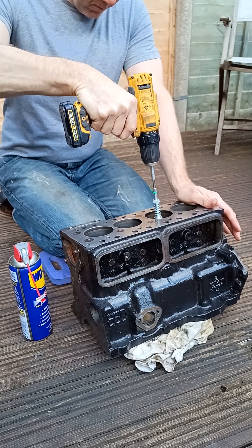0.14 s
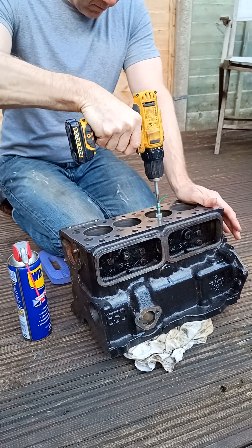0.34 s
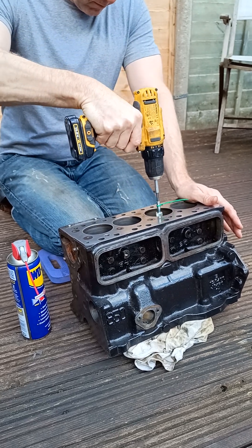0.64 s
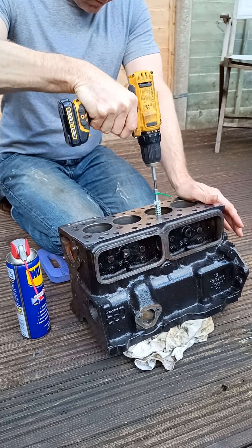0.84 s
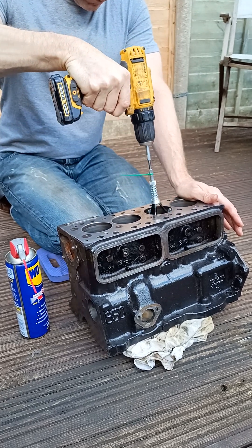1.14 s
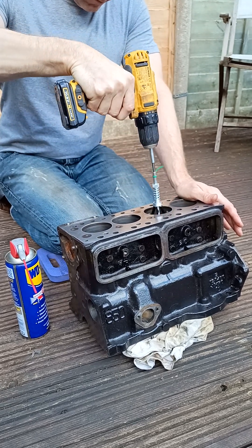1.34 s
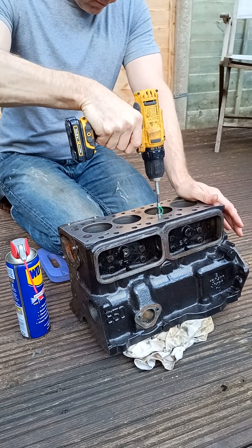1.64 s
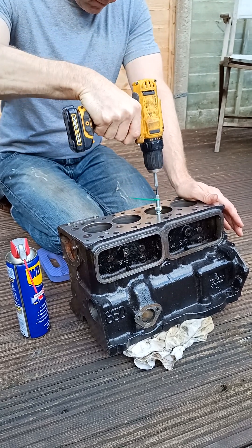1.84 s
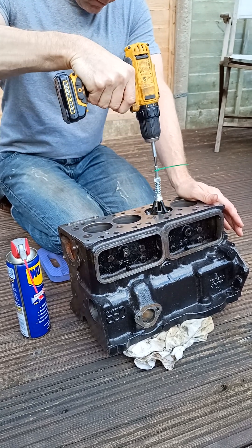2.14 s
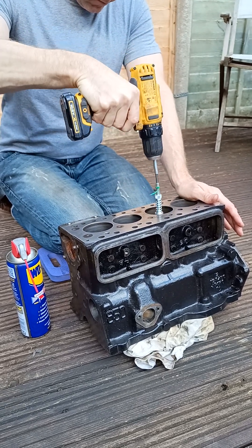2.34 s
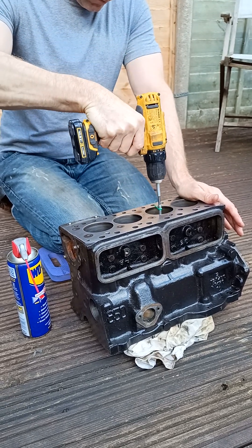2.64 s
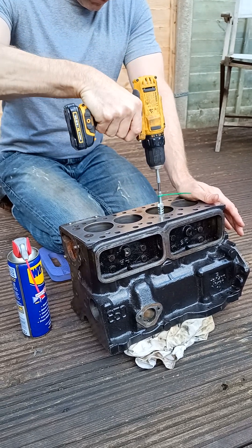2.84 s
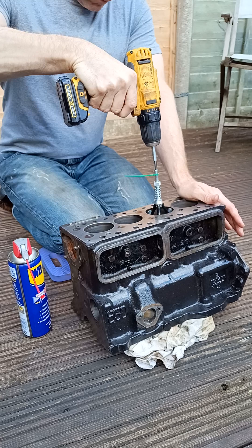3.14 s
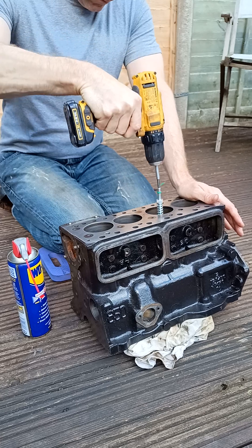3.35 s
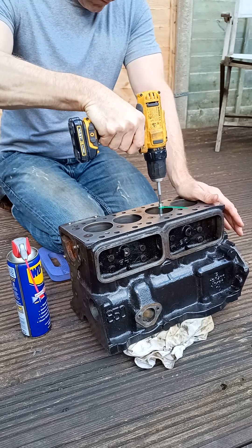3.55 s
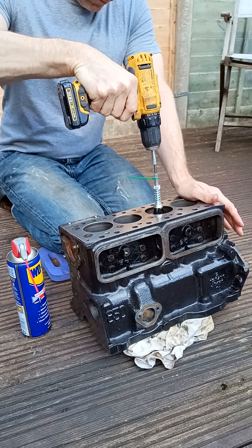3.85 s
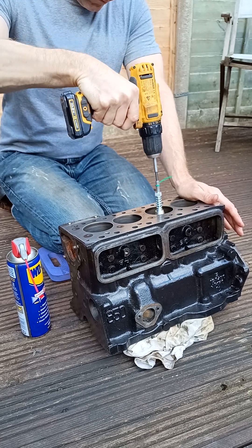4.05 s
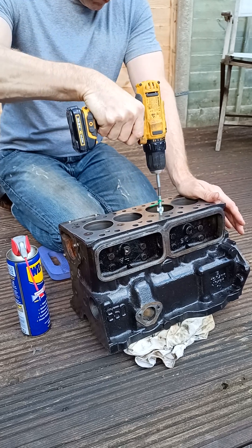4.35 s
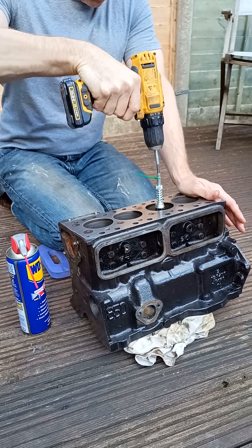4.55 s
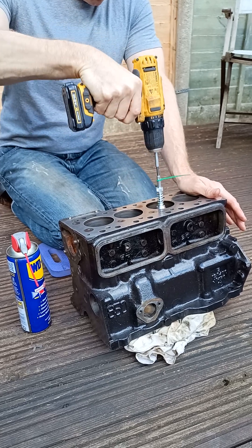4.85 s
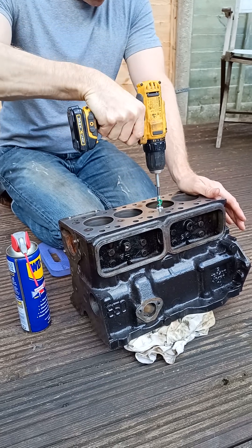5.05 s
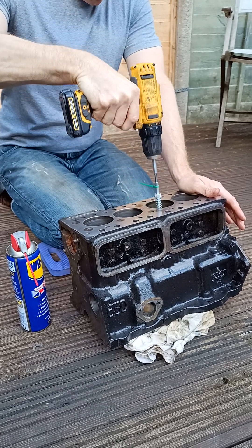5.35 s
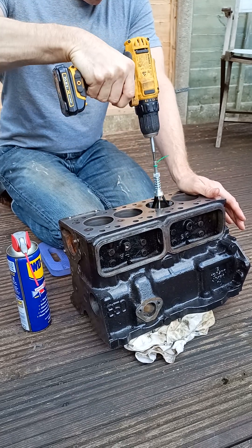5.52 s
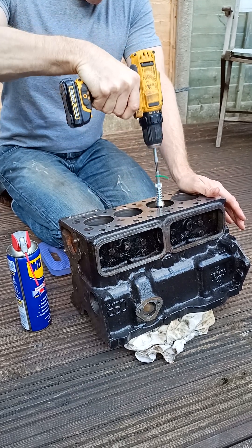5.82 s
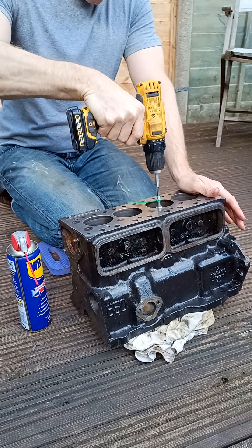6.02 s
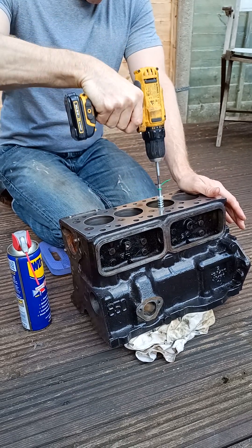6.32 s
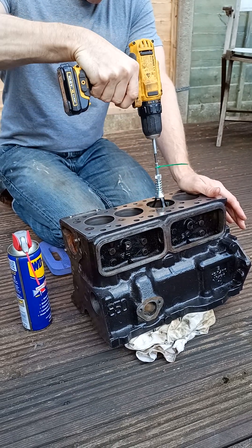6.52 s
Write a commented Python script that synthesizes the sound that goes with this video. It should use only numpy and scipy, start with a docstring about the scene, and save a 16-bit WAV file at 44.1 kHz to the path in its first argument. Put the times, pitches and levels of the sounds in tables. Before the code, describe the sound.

Honing stones scrape and rasp in an engine block's bore, spun by a whining cordless drill that slows, then speeds up again.

```python
"""A cordless drill whines as its hone grinds in a cylinder of a cast-iron engine block, on a garden deck.
Motor and gears sound through the housing; the speed controller sings near 4 kHz. The drill brakes to a
crawl, speeds up, then eases off. After a brief first bite the stones grind lightly, then bite hard,
ebbing where the stroke turns round. A faint outdoor rumble lies under it all."""
import sys
import numpy as np
from scipy import signal
from scipy.fft import rfft, irfft
from scipy.io import wavfile
from scipy.ndimage import uniform_filter1d, map_coordinates

SR = 44100
rng = np.random.default_rng(int(sys.argv[2]) if len(sys.argv) > 2 else 0)


def generate_wav(signal):
    """Clip the signal to [-1, 1] and save it as 16-bit WAV at the path in sys.argv[1]."""
    frames = np.transpose(np.atleast_2d(signal))
    scaled = np.clip(frames, -1, 1) * 32767
    pcm = np.round(scaled).astype(np.int16)
    wavfile.write(sys.argv[1], SR, pcm)


N = 294588
TIME_S = np.arange(N) / SR
FREQ_HZ = np.fft.rfftfreq(N, 1 / SR)

# Motor speed. Each row: time in seconds, speed in Hz.
MOTOR_SPEED = [(0, 75.7), (.125, 74.3), (.28, 34.15), (.47, 24.48), (.61, 34.35), (.72, 49.33), (.83, 57.1),
               (.922, 62.47), (1.092, 67.4), (1.204, 75.6), (1.36, 80.84), (1.484, 82.2), (1.64, 85.86),
               (2.84, 86.48), (3.15, 88.1), (3.3, 86.75), (3.6, 87.53), (4.3, 88.4), (4.38, 87.1),
               (4.62, 84.26), (4.87, 76.02), (5.28, 70.86), (5.42, 70.74), (5.61, 71.46), (6.07, 72.56),
               (6.33, 70.53), (6.68, 72.2)]
# Housing resonances. Each row: frequency in Hz, width in Hz, gain in dB.
HOUSING_MODES = [(536.3, 11.77, -9.5), (700, 72, -8.5), (791, 35.6, -2.5), (967, 45, -16.5), (1275, 67, -9),
                 (1312, 14.9, -9.5), (1604, 154, -15.5), (1734, 91, -8.5), (1889, 39, -6.5),
                 (2240, 108, -8), (2529, 61, -1), (4040, 170, 0)]
# Motor tones. Each row: multiple of motor speed, relative level in dB, unsteadiness from 0 to 1.
MOTOR_TONES = [(6, 3.5, 0.9), (8, -2, 0.4), (9, 2, 0.2), (10, -9.5, 0.4), (10.8, -20, .6), (12, -4.5, 0.05),
               (13, -21, .6), (13.8, -16, .8), (18, -22, 0.9)]
# The whine swells where a strong tone meets a resonance. Each row: speed in Hz, relative level in dB.
WHINE_BY_SPEED = [(29, -62), (45, -53), (59, -49.5), (65.5, -50.5), (70, -54), (77.5, -55), (82, -61),
                  (85.6, -54.5)]
# Switching tones. Each row: harmonic, offset in motor speeds, relative level in dB.
SWITCH_TONES = [(1, 0, 0), (1, -3, -14), (1, 3, -16), (1, 6, -14), (2, 0, -13), (2, -6, -8), (2, -12, -16)]
# Gear tones. Each row: multiple of motor speed, relative level in dB, unsteadiness from 0 to 1.
GEAR_TONES = [(10.8, -3.5, .4), (13, -7, .4), (13.8, -7, .7), (15, 1.5, .3), (18, -1, .4), (19, -7, .4),
              (21, -4, .4), (21.6, -2, .5), (22.2, -2, .5), (24, -3, .4), (25, -4.5, .4), (26, -6, .4),
              (27, -6, .4), (33.3, -7, .5), (44.5, -2, .5)]
# Damped resonances of the stones in the bore. Each row: frequency in Hz, width in Hz, gain in dB.
STONE_MODES = [(4450, 33, 0), (4770, 61, -2), (5226, 46, 0.5), (5420, 210, -5), (5712, 175, 1),
               (6010, 180, -5.5), (6353, 126, 0), (6750, 66, -2), (7080, 110, -4), (7550, 170, -8.5),
               (8740, 60, -4), (8980, 55, -7), (9580, 550, -11.5), (11150, 74, -5.5), (11650, 350, -7)]
# Grit hiss. Each row: frequency in Hz, gain in dB.
GRIT_SPECTRUM = [(300, -47), (500, -14), (950, -4), (1500, -4.5), (2100, -2.5), (2850, 0.5), (3100, 0),
                 (3400, 1.5), (3700, 0), (4400, 0), (4800, 1.5), (5700, 2.5), (7000, -5), (7700, 0.5),
                 (8150, -2), (8700, -2), (9600, -2.5), (10600, -2.5), (11400, 0), (12100, -6),
                 (13000, -4.5), (15500, -12.5)]
# Resonances of the hone's shaft and arms. Each row: frequency in Hz, width in Hz, gain in dB.
ARM_MODES = [(3900, 150, -14), (3700, 120, -8), (4025, 200, -5), (4230, 210, -4)]
# The stones bite. Each row: start and end in seconds, firmness, arm strain (both 1 at nominal load).
BITES = [(-.1, 0.245, 0.92, 1), (2.355, 4.171, 1, 1.05), (4.185, 6.9, 0.94, 0.82)]
# The stroke turns round and the grinding ebbs. Each row: time in seconds, depth in dB.
REVERSALS = [(0.561, 4), (1.02, 2.5), (1.62, 1.5), (1.87, 2), (2.8, 1.5), (3.66, 2), (4.34, 1), (5.32, 2.5),
             (5.72, 1.5), (6.27, 2.5)]
# Harder rasps in mid-stroke. Each row: time in seconds, rise in dB.
RASPS = [(2.04, 0.5), (2.45, 1.5), (3.3, 1), (3.85, 1.5), (4.17, 1), (4.64, 1), (4.9, 0), (5.1, 0),
         (5.55, 0), (6.0, 1.5), (6.5, 0.5)]
# Arm chatter and current rise or fall together. Each row: time in seconds, change in dB.
CHATTERS = [(1.6, -7), (2.7, -5), (2.9, -4), (3.2, -2), (3.4, 2.5), (3.62, 1), (4.0, 2.5), (5.1, -3.5),
            (5.43, -3.5), (5.58, 3), (5.7, -1), (5.96, 2), (6.3, 1.5), (6.56, 3)]
# Swells of the housing's ring. Each row: peak time in seconds, length in seconds, level in dB.
RING_SWELLS = [(0.017, .16, -53), (0.183, 0.059, -56), (.64, .08, -62), (.8, .2, -70), (4.761, 0.19, -53),
               (5.597, .22, -56), (5.8, .16, -55)]
# Outdoor rumble. Each row: frequency in Hz, gain in dB.
RUMBLE_SPECTRUM = [(25, -23), (60, -16), (115, 1.5), (170, -6.5), (240, -2.5), (330, -11), (600, -10),
                   (2000, -43)]
# Soft low bumps. Each row: start and end in seconds, level in dB.
LOW_BUMPS = [(.72, 1.093, -71.5), (1.199, 1.563, -72.5), (2.099, 2.496, -74.5), (4.62, 4.82, -73),
             (5.32, 5.778, -81)]
# Gearbox resonances under braking. Each row: frequency in Hz, width in Hz, gain in dB.
BRAKE_MODES = [(755, 180, -1), (1200, 220, 1), (1780, 200, -12)]
# Gear flares. Each row: peak time in seconds, length in seconds, multiple of motor speed, level in dB.
FLARES = [(.7, .16, 18, -65), (1.35, .42, 22.3, -64), (1.85, .7, 22, -68), (1.87, .36, 44.5, -60),
          (2.53, .26, 44.5, -53), (2.52, .2, 22, -55), (3.12, .14, 21.7, -56), (3.27, .42, 44.5, -52.5),
          (4.02, .26, 44.5, -50), (4.0, .3, 21.7, -58), (4.49, .2, 44.5, -52.5), (4.62, .55, 22.2, -55.5),
          (4.82, .2, 24, -58.5), (5.24, .36, 33.3, -54), (5.7, .32, 25, -58.5), (6.2, .48, 33.3, -57.5)]
# Stone snags. Each row: start in seconds, relative peak in dB.
SNAGS = [(3.1, -39), (3.115, -32.5), (3.139, -36), (3.197, -47), (3.233, -39), (3.3, -45), (3.368, -44),
         (5.618, -41), (5.72, -39)]
# Colour of the two microphone ports. Each row: frequency in Hz, left minus right in dB.
PORT_BALANCE = [(100, -2), (400, 2), (750, 0), (940, -8.5), (1100, 2), (1300, 0.5), (1450, 0), (1700, -4.5),
                (1950, 4.5), (2200, 3), (2550, 0.5), (2850, 4.5), (3050, 9), (3350, 1.5), (3650, -7.5),
                (4000, -3.5), (4400, -3.5), (4800, 1), (5220, 4), (5650, -5), (6050, 4), (6400, 1),
                (7100, 0), (8000, -2.5), (8900, -1.5), (11000, 1), (13000, 5.5), (15500, 11)]
# Sound bends round the microphone's case. Each row: frequency in Hz, left port's lead in radians.
PORT_PHASE = [(1100, 0), (1300, 0.9), (1600, 0.7), (1850, 1), (2050, 0), (2350, 0.24), (2700, -1),
              (3500, -2.5), (3780, 0), (4200, -0.28), (4600, 0)]


def undb(db):
    """Decibels to gain."""
    return 10 ** (np.asarray(db) / 20)


def unit(x):
    """Scale to rms 1."""
    return x / np.sqrt(np.mean(x ** 2))


def colour(points):
    """Gain at every frequency from (Hz, dB) points."""
    hz, db = np.transpose(points)
    return undb(np.interp(np.log(FREQ_HZ + 1), np.log(hz), db))


def body(modes):
    """Complex response of (Hz, width Hz, dB) resonances; their powers add."""
    each = np.array([undb(db) / (1 + 1j * (FREQ_HZ ** 2 - hz ** 2) / (width_hz * (FREQ_HZ + 1)))
                     for hz, width_hz, db in modes])
    return np.sqrt(np.sum(abs(each) ** 2, axis=0)) * np.exp(1j * np.angle(each.sum(axis=0)))


def shape(x, response):
    """Apply a frequency response."""
    return irfft(rfft(x) * response, N)


def walk(rate_hz):
    """Smooth random drift, rms 1."""
    knots = rng.standard_normal(int(N / SR * rate_hz * 2) + 3)
    joined = np.interp(TIME_S * rate_hz * 2, np.arange(len(knots)), knots)
    return unit(uniform_filter1d(joined, int(SR / rate_hz / 2)))


def grains(spread_db):
    """Three independent streams of dense, uneven micro-impacts."""
    noise = rng.standard_normal((3, N))
    return unit(noise * undb(spread_db * np.minimum(rng.exponential(size=(3, N)), 5)))


def spell(start_s, end_s, ramp_s):
    """Gate with linear ramps centred on start and end."""
    return np.clip(np.minimum(TIME_S - start_s, end_s - TIME_S) / ramp_s + .5, 0, 1)


def arch(peak_s, length_s):
    """Half-cosine swell."""
    return np.cos(np.pi * np.clip((TIME_S - peak_s) / length_s, -.5, .5))


def humps_db(events, half_s):
    """One Gaussian hump per (s, dB) row."""
    return sum(db * np.exp(-((TIME_S - s) / half_s) ** 2) for s, db in events)


def place(x, lag_ms):
    """A small source reaches the right port just after the left."""
    return np.array([x, np.interp(TIME_S - lag_ms / 1000, TIME_S, x)])


def spread(streams, scatter_db, lag_ms=0.3014):
    """One stream arrives directly; block, deck and fence scatter one more to each port. Rms 1."""
    lags = np.exp(-2j * np.pi * FREQ_HZ * np.array([[0], [lag_ms / 1000]]))
    return unit(shape(streams[0], lags) + undb(scatter_db) * streams[1:])


def housing(cut_hz=750):
    """The small plastic shell rings in the midrange and radiates no bass."""
    return body(HOUSING_MODES) / np.sqrt(1 + (cut_hz / (FREQ_HZ + 1)) ** 8)


def shaft_tones(table, speed_hz, turns, shell, waver_db=5.5, jitter_rad=0.77, full_hz=86):
    """Multiples of motor speed swell as they slide through the housing's resonances."""
    judder_rad = 0.0025 * abs(np.gradient(speed_hz)) * SR
    out = 0
    for multiple, db, unsteady in table:
        # threefold rotor: other multiples come from imbalance
        imbalance = 1 if round(multiple) % 3 == 0 else (speed_hz / full_hz) ** 2
        phase = 2 * np.pi * multiple * turns + jitter_rad * unsteady * walk(25) + judder_rad * walk(80)
        gain = undb(db + waver_db * unsteady * walk(12)) * imbalance
        out = out + gain * np.interp(multiple * speed_hz, FREQ_HZ, abs(shell)) * np.sin(phase)
    return out


def motor(speed_hz, turns, shell, bearings_db=-20, trim_db=2.5):
    """The motor whines, faintly when slow; its bearings rustle in the low housing resonances."""
    whine = shaft_tones(MOTOR_TONES, speed_hz, turns, shell)
    whine = whine / np.sqrt(uniform_filter1d(whine ** 2, SR // 6) + 0.068)
    bearings = unit(shape(rng.standard_normal(N), shell * body([(607, 300, 0)]) ** 2))
    level_db = np.interp(speed_hz, *np.transpose(WHINE_BY_SPEED)) + trim_db
    return place(whine + undb(bearings_db) * bearings, lag_ms=0.089) * undb(level_db)


def controller(speed_hz, turns, switch_hz=3958, flutter_db=2, jitter_rad=0.27, full_hz=75):
    """Chopped current makes the windings sing; commutation adds side tones that part with speed."""
    overtone_db = 6 * np.clip(1 - speed_hz / full_hz, 0, 1)  # narrow pulses at low speed
    out = 0
    for harmonic, offset, db in SWITCH_TONES:
        phase = 2 * np.pi * (harmonic * switch_hz * TIME_S + offset * turns) + jitter_rad * walk(110)
        out = out + undb(db + harmonic * overtone_db + flutter_db * walk(50)) * np.sin(phase)
    return place(out * (1 + 0.1 * np.cos(2 * np.pi * turns)), lag_ms=0.3)


def repeat_each_turn(streams, turns, carry=.75, count=6):
    """The same teeth meet on every motor turn, so their rattle repeats and changes slowly."""
    samples = np.arange(N)
    earlier = [np.interp(turns - k, turns, samples) for k in range(count)]
    return np.array([sum(carry ** k * np.interp(at, samples, x) * (at > 0)
                         for k, at in enumerate(earlier)) for x in streams])


def gears(speed_hz, turns, shell, full_hz=54.3, fade_db_per_octave=3.5):
    """Teeth mesh in tones and chatter, hardest once a motor turn; at low speed they mostly rattle."""
    load = 1 + 0.21 * np.cos(2 * np.pi * turns) + 0.51 * np.cos(6 * np.pi * turns)
    brightness = colour([(400, 14), (780, -7), (940, 8.5), (1080, 9.5), (1400, -0.5),
                         (1900, 1.5), (2600, -3), (4000, -7), (8000, -17)])
    impacts = repeat_each_turn(grains(2.9), turns) * load
    chatter = spread(shape(impacts, shell * brightness), scatter_db=-3.5)
    mesh = shaft_tones(GEAR_TONES, speed_hz, turns, shell, waver_db=7, jitter_rad=1.2)
    mesh = place(mesh, lag_ms=0.071) * (speed_hz / speed_hz.max()) ** 2
    slow_db = fade_db_per_octave * np.log2(np.minimum(speed_hz / full_hz, 1))
    return (undb(3) * chatter + undb(0.5) * mesh) * undb(slow_db)


def wander(streams, drift_s=.00013, scrape_db=2.2, stroke_db=2.2):
    """A resonance drifts in pitch, varies between strokes and flares in short scrapes."""
    warped_s = TIME_S + drift_s * walk(7)
    drifted = np.array([map_coordinates(x, [warped_s * SR], order=2, mode="mirror") for x in streams])
    return drifted * undb(scrape_db * walk(45) + stroke_db * walk(5))


def iron_block(decay_s=.004, depth=.45):
    """The block's dense, short-lived modes put a fine ripple on each path's response."""
    tail = rng.standard_normal((3, N)) * np.exp(-np.minimum(TIME_S / decay_s, 50))
    return (1 + depth * rfft(unit(tail)) / np.sqrt(N)) / np.hypot(1, depth)


def stones(speed_hz, stroke_db, body_hz=2400):
    """Stones resonate as they drag over the bore; their grit hisses and follows the stroke more."""
    scrape = sum(wander(shape(grains(2.5), body([mode]))) for mode in STONE_MODES)
    hiss = shape(grains(2.9), colour(GRIT_SPECTRUM) * iron_block()) * undb(.4 * walk(14))
    low_hiss = shape(hiss, 1 / (1 + (FREQ_HZ / body_hz) ** 8))
    hiss = hiss - low_hiss * (1 - speed_hz / speed_hz.max())  # thinner when slow
    return (spread(scrape, scatter_db=5.5) * undb(stroke_db)
            + spread(hiss, scatter_db=3) * undb(1.45 * stroke_db))


def arms(turns, gear_ratio=17, slip_db=1.5):
    """The hone's steel arms catch, slip and ring, shaken by every motor turn."""
    shake = undb(slip_db * walk(60)) * (1 + 0.5 * np.cos(2 * np.pi * turns))
    nod = 1 + .22 * np.cos(2 * np.pi * 6 * turns / gear_ratio)  # three stones, two nods per hone turn
    response = body(ARM_MODES) / (1 + ((FREQ_HZ - 4000) / 600) ** 4)
    return spread(shape(grains(2.5) * shake * nod, response), scatter_db=0)


def housing_ring(ring_hz=2510, width_hz=130):
    """The drill housing rings roughly near 2.5 kHz in brief swells."""
    swell = sum(undb(db) * arch(peak_s, length_s) for peak_s, length_s, db in RING_SWELLS)
    ring = shape(grains(1.9), body([(ring_hz, width_hz, 0)]) ** 2)
    return spread(ring, scatter_db=0, lag_ms=0.32) * swell


def outdoors(rumble_db=-73.5, bump_rest_db=-83.5):
    """Soft low bumps near 75 Hz, like wind or handling on the microphone, over an outdoor rumble."""
    bump = shape(rng.standard_normal((3, N)), body([(76.6, 39, 0)]) ** 2)
    bump = spread(bump, scatter_db=-14) * undb(2 * walk(6))
    rumble = shape(rng.standard_normal((3, N)), colour(RUMBLE_SPECTRUM))
    rumble = spread(rumble, scatter_db=-2) * undb(2 * walk(5))
    swell = sum(undb(db) * spell(start_s, end_s, ramp_s=0.074) for start_s, end_s, db in LOW_BUMPS)
    return bump * (undb(bump_rest_db) + swell) + rumble * undb(rumble_db)


def brake_rattle(start_s=.125, end_s=.255, level_db=-59):
    """The gears rattle in their slack while the motor brakes."""
    gearbox = body(BRAKE_MODES)
    rattle = spread(shape(grains(2.2), gearbox * abs(gearbox)), scatter_db=9)
    return rattle * spell(start_s, end_s, ramp_s=.08) * undb(level_db)


def stone_squeak(start_s=.27, end_s=.55, from_hz=3420, to_hz=3170, level_db=-64):
    """A stone squeaks faintly while the hone is slowest."""
    pitch_hz = np.interp(TIME_S, [start_s, end_s], [from_hz, to_hz]) + 50 * walk(90)
    tone = np.sin(2 * np.pi * np.cumsum(pitch_hz) / SR)
    return place(tone, lag_ms=0.73) * arch((start_s + end_s) / 2, end_s - start_s) * undb(level_db)


def gear_flares(turns, jitter_rad=1.1, waver_db=2.2):
    """Single gear tones swell roughly as the load shifts."""
    out = 0
    for peak_s, length_s, multiple, db in FLARES:
        swell = arch(peak_s, length_s) * undb(db + waver_db * walk(40))
        out = out + swell * np.sin(2 * np.pi * multiple * turns + jitter_rad * walk(60))
    return place(out, lag_ms=0.024)


def stone_snags(ring_hz=3950, rise_s=0.0028, jitter_rad=0.76, trim_db=-5):
    """A stone snags and lets go; the arms ring for a moment."""
    envelope = 0
    for start_s, peak_db in SNAGS:
        age = np.clip((TIME_S - start_s) / rise_s, 0, 50)
        envelope = envelope + undb(peak_db + trim_db) * age * np.exp(1 - age)
    ring = np.sin(2 * np.pi * ring_hz * TIME_S + jitter_rad * walk(120))
    return place(envelope * ring, lag_ms=0.305)


def scene():
    """Motor speed sets the drill's pitch; bite and acceleration load controller, gears and hone."""
    speed_hz = np.interp(TIME_S, *np.transpose(MOTOR_SPEED))
    turns = np.cumsum(speed_hz * (1 + 0.002207 * walk(10.7))) / SR
    shell = housing()
    bite, flex = sum(np.outer(loads, spell(start_s, end_s, ramp_s=0.12))
                     for start_s, end_s, *loads in BITES)
    accel_hz_per_s = uniform_filter1d(np.gradient(speed_hz) * SR, SR // 5)
    strain = np.clip(accel_hz_per_s / 82, 0, 1)
    coasting = spell(start_s=0.137, end_s=0.38, ramp_s=0.025)  # trigger released
    ebb_db = humps_db(REVERSALS, half_s=0.082)
    stroke_db = humps_db(RASPS, half_s=0.11) - ebb_db
    chatter_db = humps_db(CHATTERS, half_s=0.027)
    # gain under light contact, plus load terms
    switch_db = -61 + 9.5 * flex + 3.5 * strain - 0.35 * ebb_db * bite + chatter_db
    gear_db = -63.5 + 8 * bite + 2.5 * strain - 0.15 * ebb_db
    grind_db = -54.5 + 6.5 * bite
    arm_db = -65 + 9.5 * flex + 4 * strain - 0.1 * ebb_db + chatter_db
    drill = motor(speed_hz, turns, shell) * undb(-2 * coasting)
    drill += controller(speed_hz, turns) * (1 - coasting) * undb(switch_db)
    drill += gears(speed_hz, turns, shell) * undb(gear_db) + gear_flares(turns) + brake_rattle()
    hone = stones(speed_hz, stroke_db) * undb(grind_db) + arms(turns) * undb(arm_db)
    return drill + hone + stone_snags() + housing_ring() + stone_squeak() + outdoors()


def record(dry, top_hz=15750):
    """Each microphone port has its own colour and phase; the top is cut steeply."""
    lead_rad = np.interp(FREQ_HZ, *np.transpose(PORT_PHASE))
    left = np.sqrt(colour(PORT_BALANCE)) * np.exp(.5j * lead_rad)
    ported = shape(dry, np.array([left, 1 / left]))
    return signal.sosfilt(signal.ellip(12, .1, 80, top_hz, fs=SR, output="sos"), ported)


dry = scene()
out = record(dry)
generate_wav(out)
```